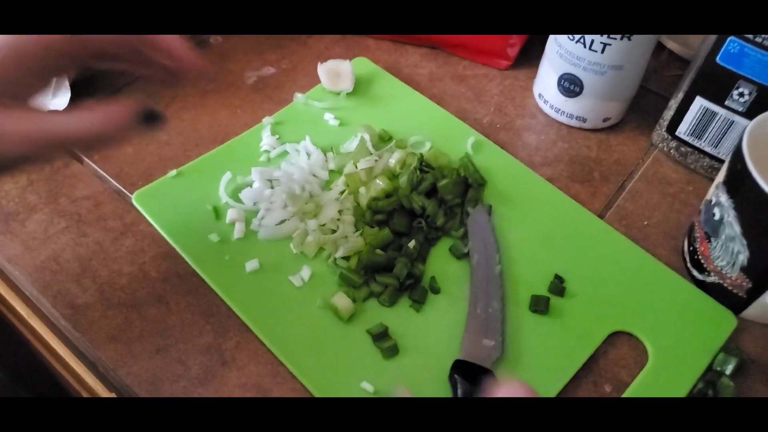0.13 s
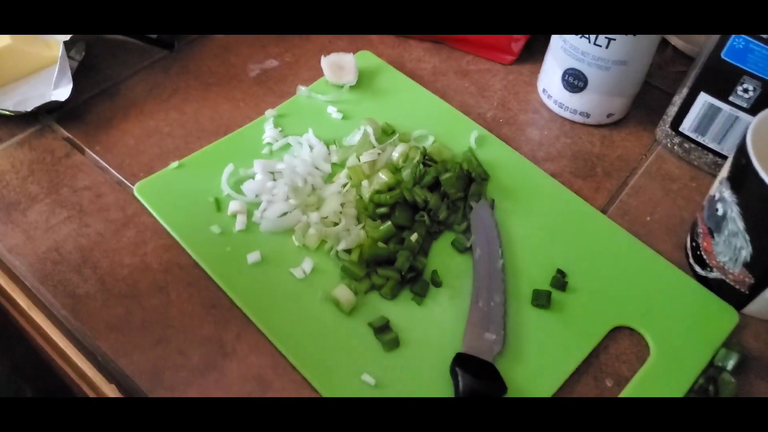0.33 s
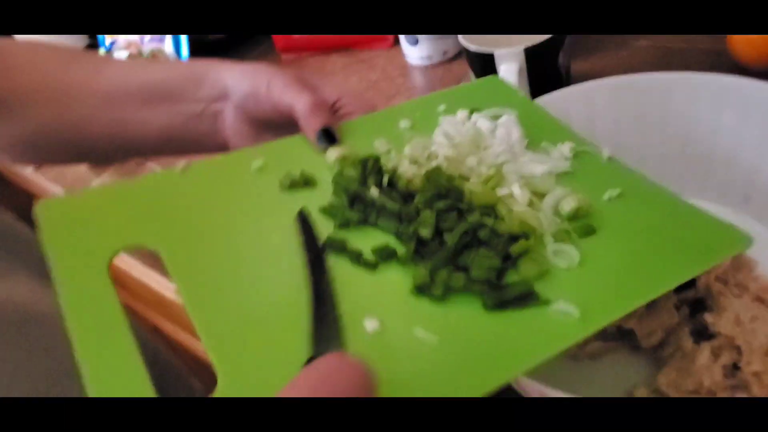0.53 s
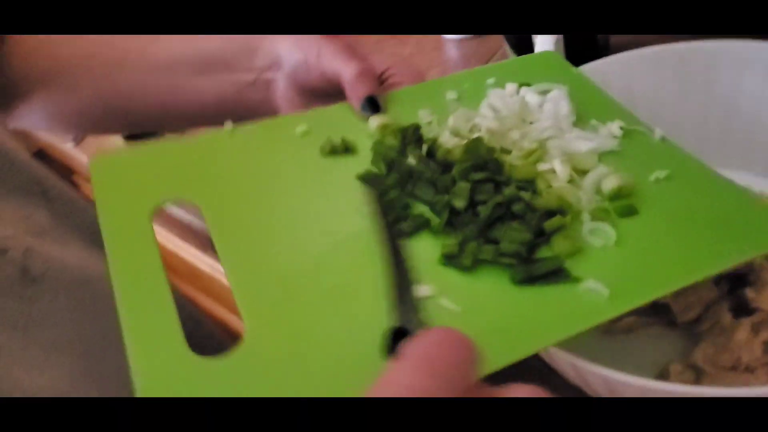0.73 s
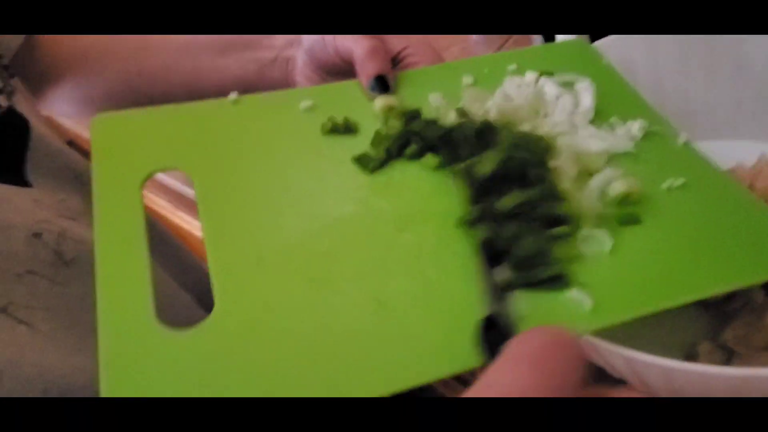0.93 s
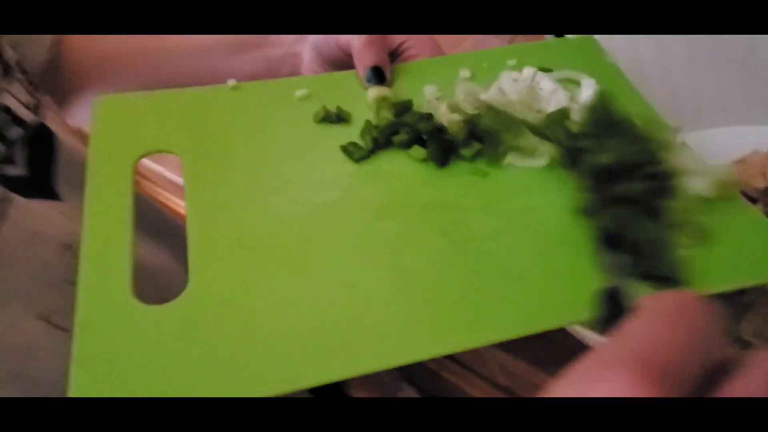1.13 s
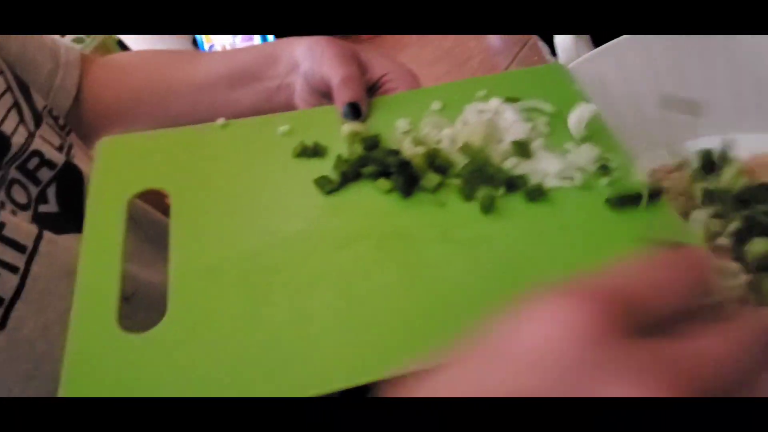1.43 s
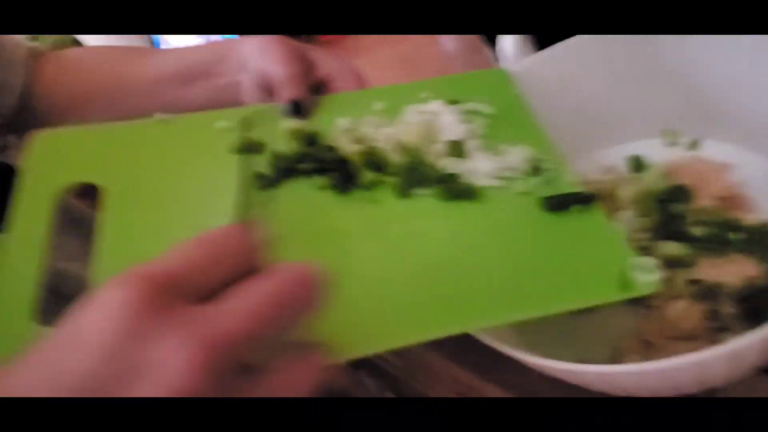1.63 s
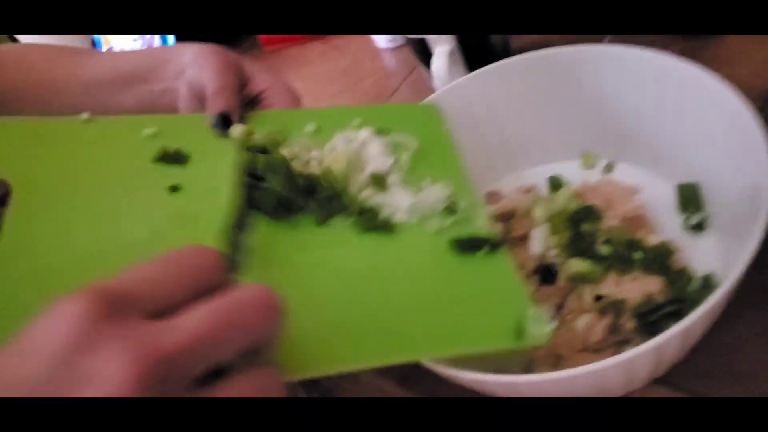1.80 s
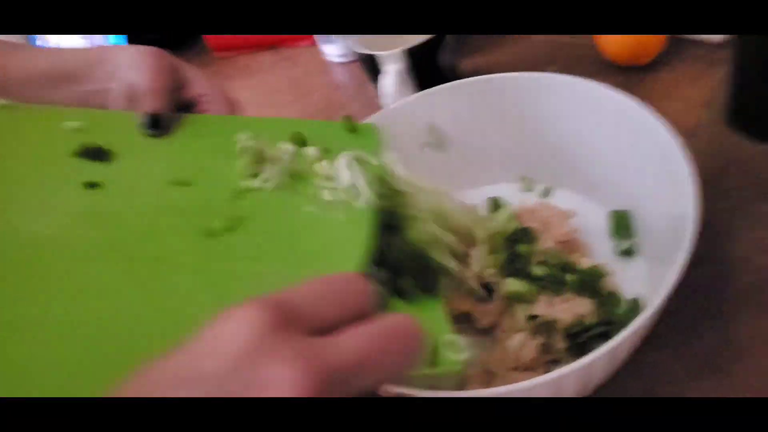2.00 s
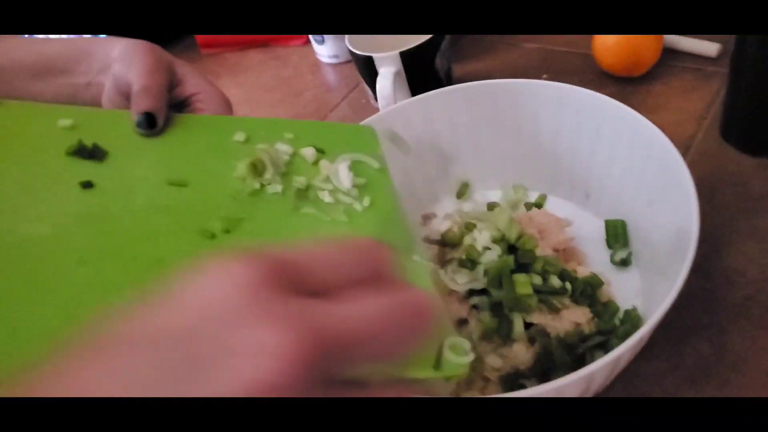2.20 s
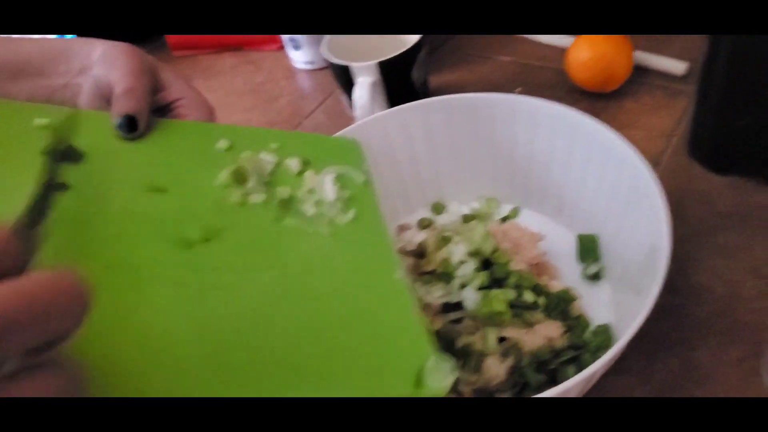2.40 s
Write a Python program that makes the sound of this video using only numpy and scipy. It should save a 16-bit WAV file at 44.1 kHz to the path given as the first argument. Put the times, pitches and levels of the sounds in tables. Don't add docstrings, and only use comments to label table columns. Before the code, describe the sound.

A knife edge scrapes across a plastic chopping board, sweeping chopped vegetables into a bowl

```python
import sys
import numpy as np
from scipy import signal
from scipy.fft import rfft, irfft, next_fast_len
from scipy.io import wavfile
from scipy.ndimage import uniform_filter1d, map_coordinates

SR = 44100
rng = np.random.default_rng(int(sys.argv[2]) if len(sys.argv) > 2 else 0)


def amplitude_ratio(level_db):
    exponent = np.asarray(level_db, float) / 20
    return 10 ** exponent


def wav_record(signal):
    frames = np.transpose(np.atleast_2d(signal))
    bounded = np.clip(frames, -1, 1)
    quanta = np.round(bounded * 32767).astype(np.int16)
    wavfile.write(sys.argv[1], SR, quanta)


N = 112454

# start_s, pressure_db, hiss_db, brightness_db
STROKES = [
    [(.58, -67, -103, -4), (.695, -63, -81.5, 3), (.705, -32.5, -72, -11.5), (.73, -34, -61, -30),
     (.762, -51.5, -84, -1), (.796, -32, -57.5, -7), (.825, -33, -57, -10), (.858, -82, -86, -19)],
    [(.866, -41.5, -71, -9), (.905, -29, -42.5, 0.5), (1.035, -28, -36.5, 1.5), (1.09, -34.5, -48, 0.5),
     (1.26, -30.5, -33, 3), (1.3, -31, -38, 6), (1.465, -33.5, -41, 3), (1.5, -66, -67, -14),
     (1.59, -53.5, -70, -27)],
    [(1.82, -60.5, -78, 0), (1.88, -57, -52.5, 8), (1.93, -59.5, -56.5, -7), (1.975, -52, -54.5, 1),
     (2.02, -52.5, -49.5, -21), (2.082, -45, -50.5, -15)],
    [(2.09, -35.5, -46.5, -5), (2.12, -33.5, -48, -2.5), (2.16, -41.5, -49.5, 2), (2.18, -47.5, -51.5, 5),
     (2.215, -41.5, -56, 5), (2.25, -47, -55.5, 9.5), (2.31, -46.5, -68, -1), (2.42, -50, -74, 1),
     (2.55, -56.5, -86, -10)],
]
# start_s, place (0-2)
BLADE_PLACE = [(0, 0.13), (1.1, 0.055), (1.19, 1.26), (1.26, 1.37), (1.32, 2.08), (1.55, 2.4), (1.6, 1.15),
               (2.55, 1.01)]
# pitch_hz, width_hz, level_db
BOARD_LOW = [
    [(293.7, 29, -6.5), (423, 57, -13.5), (491, 40, -3), (550, 48, 0.5), (699, 59, 1), (1000, 115, -8.5),
     (1245, 176, -15)],
    [(324, 130, -9), (442, 67, 1), (552, 117, -4), (718, 40, -1), (975, 270, -12)],
    [(497, 65, -7.5), (726, 76, 1), (1002, 94, -5), (1127, 68, -7)],
]
# pitch_hz, width_hz, level_db
BOARD_HIGH = [(1570, 16, -22), (1732, 270, 5), (2505, 96, 1.5), (2550, 200, -6.5), (3544, 340, -1.5),
              (4400, 330, -31.5)]
# start_s, level_over_rub_db
SNAGS = [(.868, 21), (.892, 25), (.911, 23), (.938, 21), (.977, 24), (.986, 28.5), (.998, 26),
         (1.035, 15.5), (1.11, 25), (1.134, 27), (1.198, 21), (1.223, 28), (1.252, 25), (1.308, 5),
         (1.379, 25), (1.49, 26), (2.088, 20), (2.105, 21.5), (2.117, 12), (2.148, 30.5), (2.163, 14.5)]
# pitch_hz, density_db (per Hz)
GLIDE = [(2650, 3.5), (4500, -4), (6630, -12), (10200, -6.5), (11900, -3.5), (14900, -10), (16000, -6.5)]
# start_s, left_minus_right_db
BOARD_LEFT = [(.6, -1.5), (1.1, -3), (1.5, -5.5), (2.0, -4), (2.55, 1.5)]
# start_s, level_db
HANDS = [(0.3, -40.5), (0.47, -58), (0.66, -48), (0.83, -53), (1.42, -38.5), (1.52, -47), (1.86, -57.5),
         (2.08, -39.5), (2.55, -45)]
# start_s, peak_db, pitch_hz, left_minus_right_db
KNOCKS = [(0.696, -17, 609, -1.5), (0.776, -29.5, 680, 0), (0.795, -26, 710, -3), (0.892, -25, 680, -2),
          (0.91, -25.5, 698, 2), (1.133, -18.5, 703, -2.5), (1.251, -33, 705, -2), (1.3385, -16, 725, -2),
          (2.087, -26, 640, -1.5), (1.578, -43, 515, 16), (1.601, -29, 442, -8), (1.611, -28.5, 585, 2),
          (1.871, -34, 543, 19), (2.267, -30.5, 540, 18), (2.369, -33, 720, 0), (2.432, -37, 815, -4),
          (2.512, -43, 800, 0)]
# start_s, level_db, pitch_hz
THUMPS = [
    (1.327, -34, 143),
    (1.38, -27, 153),
    (1.44, -33, 135),
    (1.51, -33, 151),
]
# start_s, peak_db, crack_db
BOUNCES = [
    (0.2278, -7.5, -7.5),
    (0.2299, -18, -73),
    (0.2446, -12.5, -1),
    (0.2691, -18, -30),
    (0.2933, -30.5, -48),
]
# pitch_hz, level_db, t60_s
KNIFE = [(311, -11, 0.062), (1302, -10, 0.15), (1743, -5.5, 0.03), (2100, 1.5, 0.038), (2365, 4, 0.018),
         (2800, 5, 0.017), (3110, 7, 0.0034), (3566, 4, 0.014)]
# start_s, peak_db, pitch_hz, crack_db
BITS = [(0.129, -77.5, 1500, -20), (0.1814, -66.5, 3400, -23), (0.4159, -62.5, 2080, 2.5),
        (.569, -79.5, 4490, -2.5), (0.5887, -72, 2500, -3), (0.612, -73, 1300, -18),
        (0.6978, -62, 1550, -3), (0.9368, -31.5, 1340, -11), (1.6026, -39.5, 1630, -38),
        (1.6118, -39.5, 1510, -16.5), (1.645, -48, 3040, -15), (1.666, -42, 1500, -34),
        (1.6908, -34.5, 2210, -14), (1.722, -48.5, 1290, -13.5), (1.825, -59, 2200, 1.5),
        (1.8544, -62.5, 2120, 1), (1.9729, -47, 1750, -13), (2.068, -49.5, 1290, -25),
        (2.203, -48, 1110, -24), (2.213, -37.5, 1000, -32), (2.2363, -35, 2100, -46),
        (2.262, -53, 3040, -23), (2.2879, -42, 1640, -44), (2.324, -37.5, 2670, -40),
        (2.3403, -36.5, 1470, -38), (2.331, -51.5, 1500, -19), (2.347, -50, 1400, -16),
        (2.369, -38, 1320, -27), (2.378, -40.5, 1500, -30), (2.395, -40, 2370, -28),
        (2.4327, -44, 1500, -42), (2.468, -50, 1170, -37), (2.5102, -53, 1210, -27)]
# pitch_hz, t60_s
ROOM = [(200, 0.59), (2000, 0.24), (10000, 0.21)]
# pitch_hz, density_db (per Hz)
RUMBLE = [(12, -53), (20, -54.5), (64, -9), (130, -16), (189, -5.5), (422, -9.5), (700, -21.5), (910, -33),
          (1540, -120)]
# pitch_hz, density_db (per Hz)
AIR = [(410, -15), (700, -14.5), (1300, -16), (2000, -16), (4600, -30), (7290, -32.5), (12500, -24),
       (16000, -38.5)]
# pitch_hz, level_db
HUM = [(59, -53), (92, -63.5), (186, -52.5), (280, -56)]
# pitch_hz, likeness (0-1)
ALIKE = [(100, 0.81), (400, 0.18), (2400, -0)]

CATCH_PER_S, CATCH_DB, RUB_DB = 450, 4.5, -5
WANDER_DB, HIGH_DB = 2.5, -8
LOW_TOP_HZ, HIGH_TOP_HZ = 1500, 5030
PATCHY_DB, LIGHT_TILT = 2, 0.78
SHAKE_DB = -9
KNOCK_T60, LATE_S = 0.031, 0.001395
CRACK_T60 = 0.007
DROP_LEFT_DB = -5.5
THUD_HZ, THUD_DB, THUD_S, THUD_T60 = 106, -18.5, 0.25, 0.078
BIT_DB, BIT_T60, SPREAD = -0.5, 0.014, 0.25
SNAP_DB, SNAP_T60 = 7, 0.009
ROOM_DB, NEAR_DB = -10, -4
LEFT_LAG_S = 0.0001
RUMBLE_DB, AIR_DB, FLOOR_LEFT_DB = -53.5, -70.5, -4.5
TOP_HZ = 15750


def unit(x):
    return x / np.sqrt(np.mean(x ** 2) + 1e-20)


def along(points, hz):
    f, v = np.transpose(points)
    return np.interp(np.log(hz + 1), np.log(f + 1), v)


def wobble(rate):
    knots = rng.standard_normal(int(N * rate / SR) + 4)
    return map_coordinates(knots, [np.arange(N) * rate / SR])


def filtered(x, response):
    m = next_fast_len(N + SR // 2)
    return irfft(rfft(x, m) * response(np.fft.rfftfreq(m, 1 / SR)), m)[..., :N]


def body(peaks):
    def response(f):
        rows = []
        for k, (centre, width, db) in enumerate(peaks):
            damping = 1j * f * width
            rows.append((-1) ** k * amplitude_ratio(db) * damping / (centre * centre - f * f + damping))
        return np.array(rows)
    return response


def add(out, s, x):
    part = out[..., round(s * SR):][..., :x.shape[-1]]
    part += x[..., :part.shape[-1]]


def ring(modes, t):
    out = 0
    for hz, db, t60 in modes:
        out = out + amplitude_ratio(db + rng.normal(0, 2) - 60 * t / t60) * np.sin(2 * np.pi * hz * t)
    return out


def crack(db, t):
    return amplitude_ratio(db - 60 * t / CRACK_T60) * np.convolve(rng.standard_normal(len(t)), [1, 0, -1], "same")


def sides(db):
    return amplitude_ratio([[db / 2], [-db / 2]])


def patchy(x, db):
    z = signal.stft(x, nperseg=512)[2]
    field = uniform_filter1d(rng.standard_normal(z.shape[1:]), size=7, axis=0)
    field = uniform_filter1d(field, size=9, axis=1)
    return unit(signal.istft(z * amplitude_ratio(db * unit(field)), nperseg=512)[1][:, :N])


def edge_force():
    catches = (rng.random(N) < CATCH_PER_S / SR) * amplitude_ratio(CATCH_DB * rng.exponential(size=N).clip(0, 3))
    force = unit(catches - catches.mean()) + amplitude_ratio(RUB_DB) * rng.standard_normal(N)
    force = force * amplitude_ratio(0.89 * wobble(70))
    force = force / np.sqrt(abs(uniform_filter1d(force ** 2, size=2500)))
    for s, db in SNAGS:
        add(force, s + 0.001046, -amplitude_ratio([db]))
    return force


def rung(force, press, modes):
    wander = amplitude_ratio(WANDER_DB * np.array([wobble(14) for _ in modes]))
    pressed = (wander * filtered(force * press, body(modes))).sum(0)
    even = (wander * filtered(force, body(modes))).sum(0)
    return pressed / np.std(even)


def scrape():
    t, rows = np.arange(N) / SR, np.concatenate(STROKES)
    on = t >= rows[0, 0]
    press_db, glide_db, bright_db = [np.interp(t, rows[:, 0], rows[:, k]) for k in range(1, 4)]
    force, press = edge_force(), amplitude_ratio(press_db) * on
    place = np.interp(t, *np.transpose(BLADE_PLACE))

    low = 0
    for k, modes in enumerate(BOARD_LOW):
        nearness = np.sqrt(np.clip(1 - abs(place - k), 0, 1))
        low = low + nearness * rung(force, press, modes)
    low = filtered(low, lambda f: 1 / (1 + 1j * f / LOW_TOP_HZ))
    high = filtered(rung(force, press, BOARD_HIGH), lambda f: 1 / (1 + 1j * f / HIGH_TOP_HZ))
    board = low + amplitude_ratio(HIGH_DB + bright_db) * high

    grit = rng.standard_normal((2, N)) + 0.14 * rng.standard_normal(N) + 0.092 * unit(force)
    hiss = patchy(filtered(grit, lambda f: amplitude_ratio(along(GLIDE, f))), PATCHY_DB)
    light = LIGHT_TILT * (t >= STROKES[2][0][0])
    hiss = (1 - light) * hiss + light * unit(np.diff(hiss, prepend=0))
    hiss = hiss * amplitude_ratio(glide_db + 2.1 * wobble(40.15)) * on
    board_sides = sides(np.interp(t, *np.transpose(BOARD_LEFT)))[:, 0]
    return board * board_sides + amplitude_ratio(2.0) * hiss * sides(-3.7)


def knocks():
    out, t = np.zeros((2, N)), np.arange(SR // 8) / SR
    for s, db, hz, pan in KNOCKS:
        modes = [(hz, 0, KNOCK_T60), (hz * 0.665, -8, KNOCK_T60), (hz * 0.797, -7, KNOCK_T60),
                 (hz * 1.304, -5, KNOCK_T60 * 0.26)]
        add(out, s + LATE_S, amplitude_ratio(db) * ring(modes, t) * (1 - np.exp(-t / 0.0007)) * sides(pan))
    for s, db, hz in THUMPS:
        add(out, s, amplitude_ratio(db) * ring([(hz, 0, 0.09)], t) * (1 - np.exp(-t / 0.0026)))
    return out


def knife_drop():
    out, rattle, t = np.zeros(N), np.zeros(N), np.arange(SR // 4) / SR
    for s, db, crack_db in BOUNCES:
        modes = [(hz * np.exp(rng.normal(0, 0.012)), level, t60) for hz, level, t60 in KNIFE]
        blow = ring(modes, t) * (1 - np.exp(-t / 0.00019)) + crack(crack_db + 0.5, t)
        add(out, s + 0.00064, amplitude_ratio(db - 11.5) * blow)
        add(rattle, s + 0.00083, amplitude_ratio(db - 60 * t / 0.1) * rng.standard_normal(len(t)))
    thud = amplitude_ratio(THUD_DB - 60 * t / THUD_T60) * (1 - np.exp(-t / 0.019)) * np.sin(2 * np.pi * THUD_HZ * t)
    add(out, THUD_S, thud)
    rattle_body = body([(424, 2600, -10.0), (2930, 2230, -5), (7060, 7000, -38.5)])
    return (out + filtered(rattle, rattle_body).sum(0)) * sides(DROP_LEFT_DB)


def falling_bits():
    out, tumble, t = np.zeros(N), np.zeros(N), np.arange(SR // 8) / SR
    for s, db, hz, crack_db in BITS:
        hit = crack(crack_db + 3.5, t)
        for k in [0, *rng.standard_normal(size=7)]:
            mode = (hz * np.exp(SPREAD * k), -9 * abs(k), BIT_T60)
            add(hit, rng.integers(60) / SR, ring([mode], t))
        add(out, s + 0.00067, amplitude_ratio(db + BIT_DB) * hit)
        fade = amplitude_ratio(db - 60 * t / 0.15) + amplitude_ratio(db + SNAP_DB - 60 * t / SNAP_T60)
        add(tumble, s + 0.00095, fade * rng.standard_normal(len(t)))
    tumble = filtered(tumble * amplitude_ratio(7.9 * wobble(150)), lambda f: body([(2000, 2600, -1.5)])(f)[0] ** 3)
    return (out + tumble) * sides(-11.0)


def hand_rumble():
    noise = rng.standard_normal((2, N)) + 1.2 * rng.standard_normal(N)
    shake = unit(filtered(noise, lambda f: (f / 50) ** 2 / (1 + (f / 70) ** 5)))
    level_db = np.interp(np.arange(N) / SR, *np.transpose(HANDS)) + 1.4 * wobble(7.6)
    return amplitude_ratio(SHAKE_DB) * shake * amplitude_ratio(level_db) * sides(-0.5)


def room(x, size=4096):
    out, x = np.zeros((2, N + SR)), np.pad(x, ((0, 0), (size, 2 * size)))
    for k in range(0, N + size, size):
        hz, t, z = signal.stft(rng.standard_normal((2, SR // 3)), SR, nperseg=256)
        tail = signal.istft(z * amplitude_ratio(-60 * t / along(ROOM, hz)[:, None]), SR, nperseg=256)[1]
        near_fade = amplitude_ratio(-60 * np.arange(tail.shape[1]) / SR / 0.0047)
        near = np.diff(rng.standard_normal(tail.shape), prepend=0) * near_fade
        answer = amplitude_ratio(ROOM_DB) * tail / np.linalg.norm(tail[0])
        answer = answer + amplitude_ratio(NEAR_DB) * near / np.linalg.norm(near[0])
        piece = x[:, k:k + 2 * size] * np.hanning(2 * size)
        add(out, k / SR, signal.fftconvolve(piece, answer, axes=1))
    return out[:, size - 30:][:, :N]


def kitchen():
    t, out = np.arange(N) / SR, 0
    for hz, db in HUM:
        out = out + amplitude_ratio(db + 0.5 * wobble(5.46)) * np.sin(2 * np.pi * hz * t + 1.08 * wobble(6.38))

    def mid_side(colour):
        def response(f):
            turn = np.arccos(np.clip(along(ALIKE, f), -1, 1)) / 2
            density = amplitude_ratio(along([(1, -120), *colour, (SR, -120)], f))
            return density * [np.cos(turn), np.sin(turn)]
        return response

    for colour, db in ((RUMBLE, RUMBLE_DB), (AIR, AIR_DB)):
        mid, side = filtered(rng.standard_normal((2, N)), mid_side(colour))
        out = out + amplitude_ratio(db + 1.32 * wobble(3.2)) * unit(np.array([mid + side, mid - side]))
    return out * sides(FLOOR_LEFT_DB)


def scene():
    close = scrape() + knocks() + knife_drop() + falling_bits()
    lag = lambda f: np.exp(-1j * np.pi * f * LEFT_LAG_S * np.array([[1], [-1]]))
    return filtered(close + room(close), lag) + hand_rumble() + kitchen()


def band_limit(x):
    return signal.sosfilt(signal.butter(12, 16550, fs=SR, output="sos"), x)


def record(dry):
    mix = filtered(dry, lambda f: 1 / (1 + (f / TOP_HZ) ** 80))
    return band_limit(mix)


dry = scene()
out = record(dry)
wav_record(out)
```